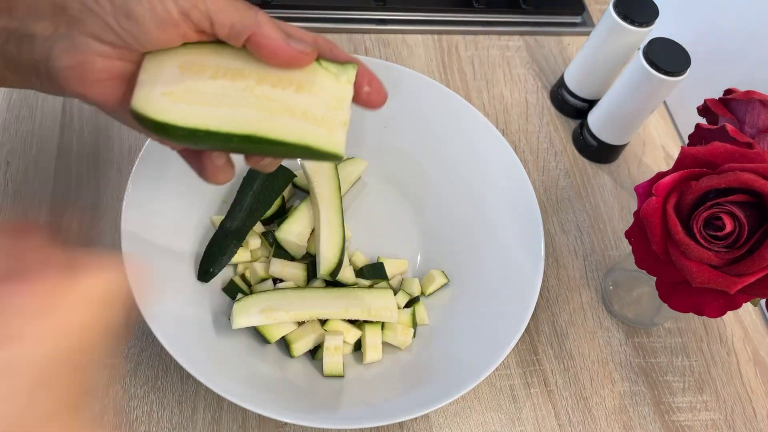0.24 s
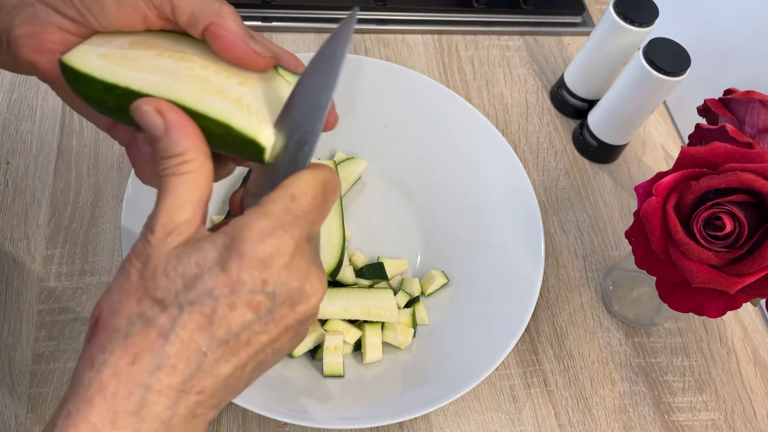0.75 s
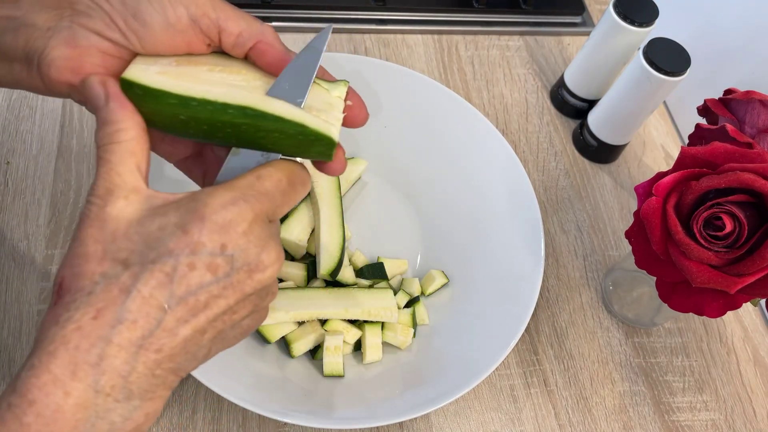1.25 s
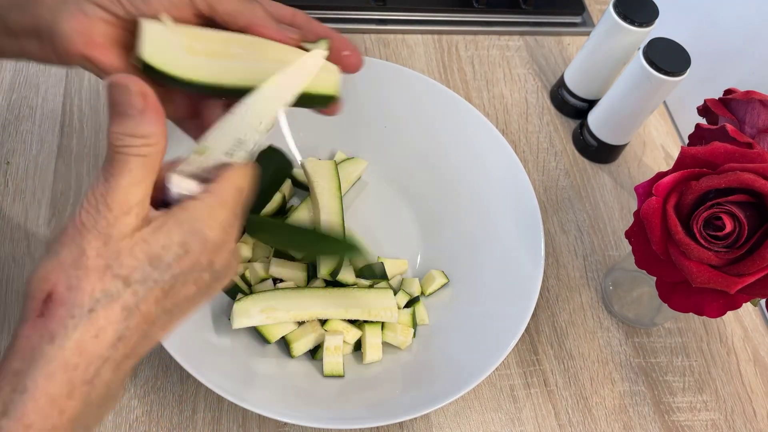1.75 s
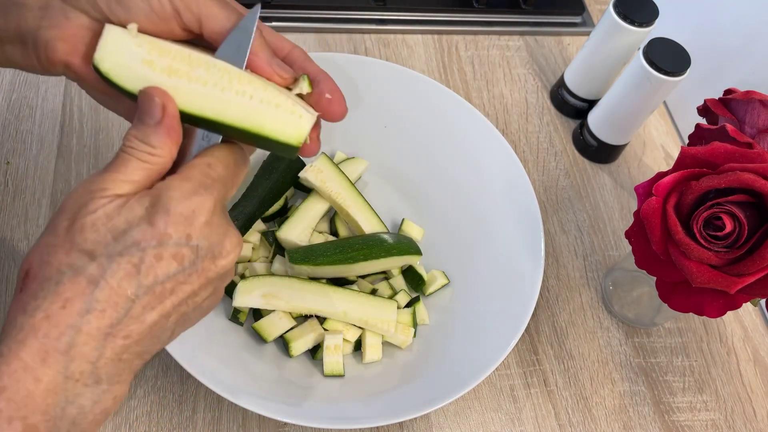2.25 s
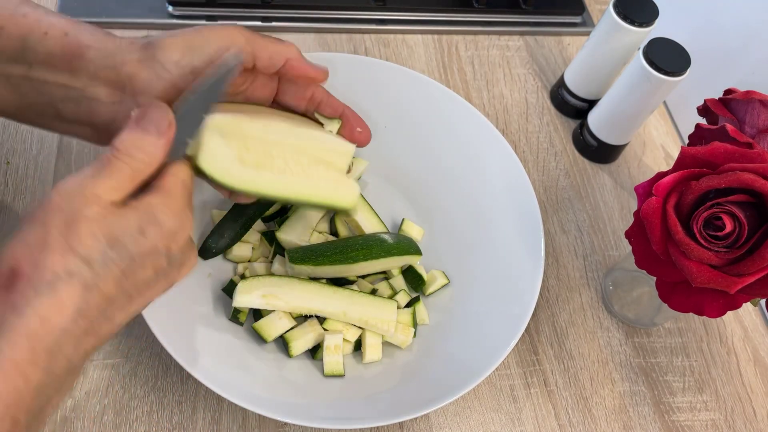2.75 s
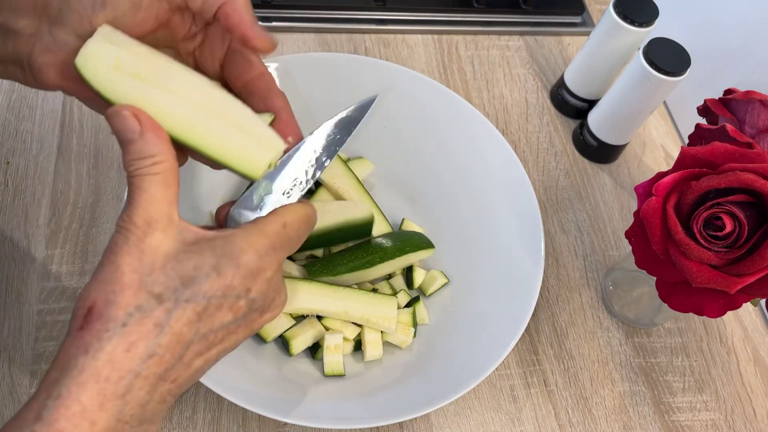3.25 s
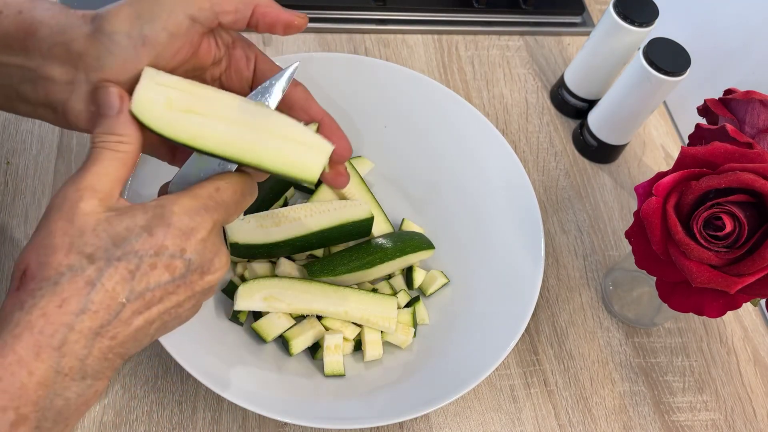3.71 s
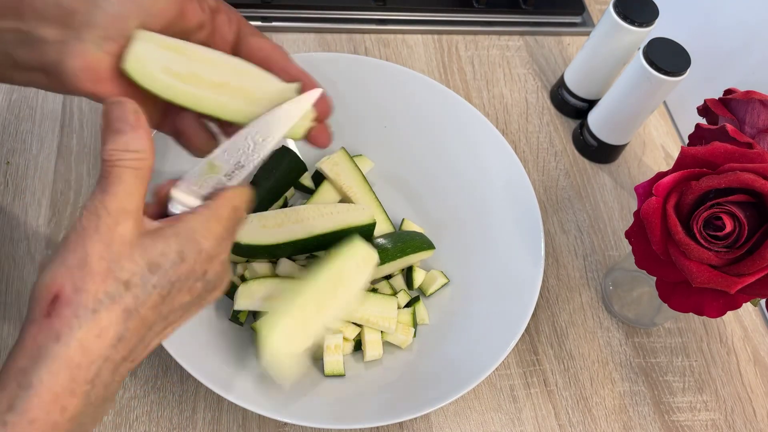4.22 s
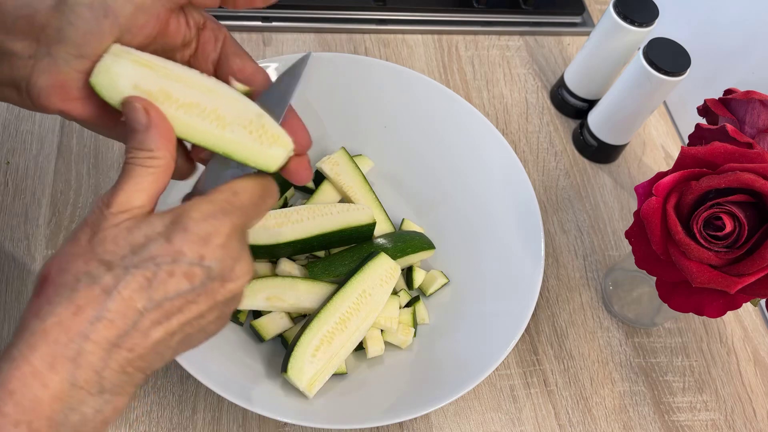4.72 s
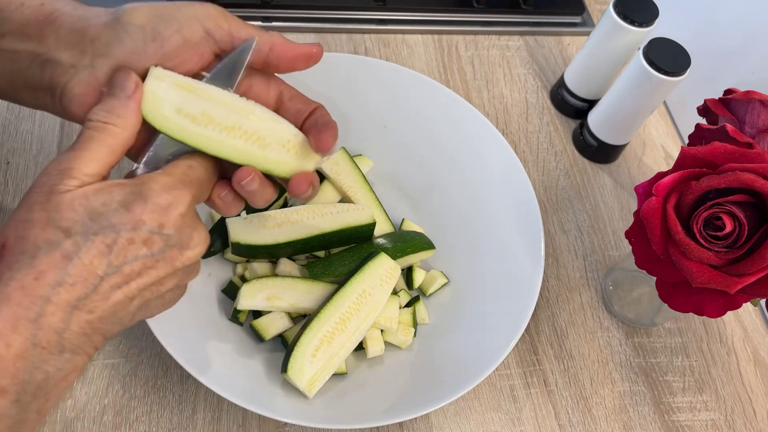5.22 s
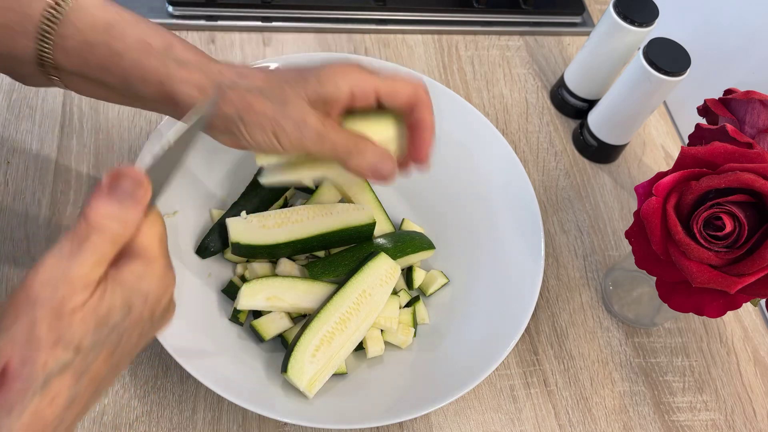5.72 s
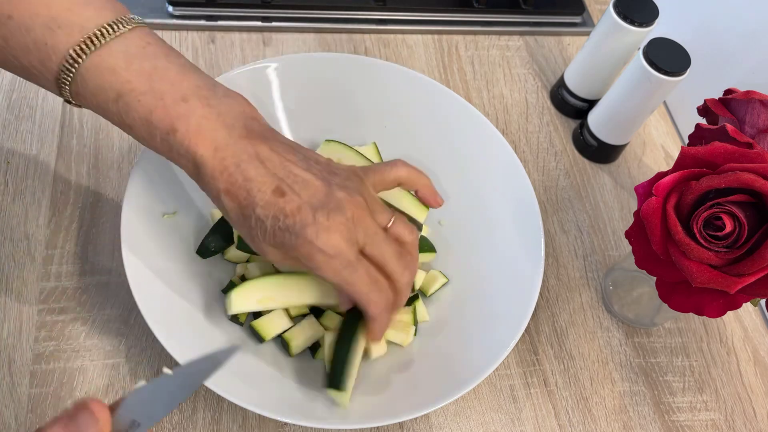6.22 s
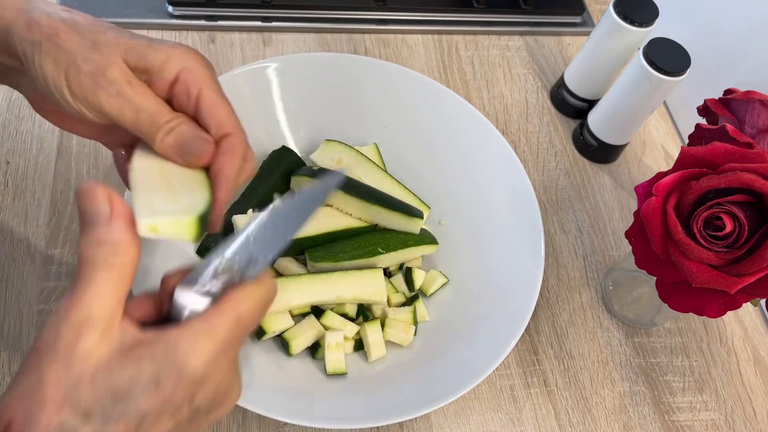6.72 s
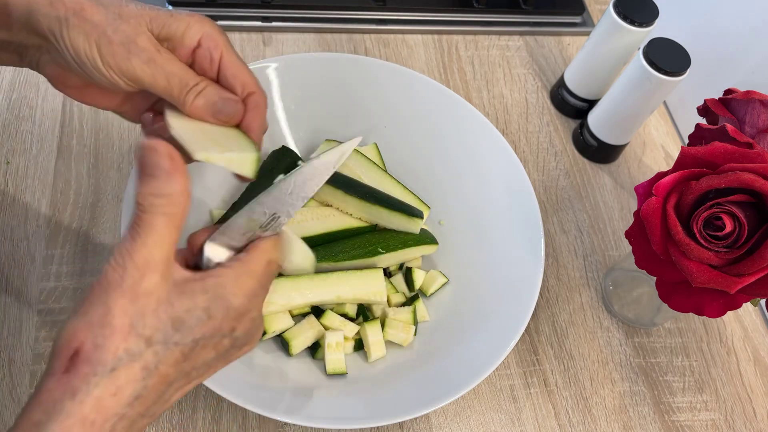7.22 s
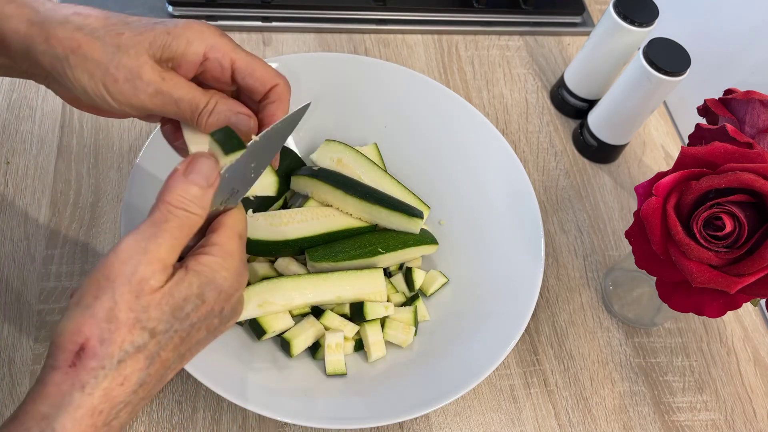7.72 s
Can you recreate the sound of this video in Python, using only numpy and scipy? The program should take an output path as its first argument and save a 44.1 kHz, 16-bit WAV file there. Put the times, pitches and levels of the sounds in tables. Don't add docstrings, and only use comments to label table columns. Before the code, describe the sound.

Close, moist crunching strokes of a blade through firm courgette, with bright snaps, dull falling pieces and a low room hum behind.

```python
import sys
import numpy as np
from scipy import signal
from scipy.fft import rfft, irfft, next_fast_len
from scipy.io import wavfile

SR = 44100
rng = np.random.default_rng(int(sys.argv[2]) if len(sys.argv) > 2 else 0)


def natural_amplitude(level_db):
    exponent = np.asarray(level_db, float) / 20
    return 10 ** exponent


def bounce(signal):
    frames = np.transpose(np.atleast_2d(signal))
    limited = np.clip(frames, -1, 1)
    pcm = np.round(limited * 32767).astype(np.int16)
    wavfile.write(sys.argv[1], SR, pcm)


N = 351036

# [t/s, peak level/dB, knock f/Hz, knock t60/s, bowl share/dB]
PIECES = [(0.141, -61, 710, 0.0096, -30), (1.695, -56, 636, 0.0097, -11), (1.879, -67, 600, 0.024, -24),
          (2.845, -56.5, 850, 0.02, -32), (2.895, -49.5, 930, 0.021, -30), (4.16, -68, 975, 0.037, -22),
          (4.267, -41, 1260, 0.017, -13), (5.805, -65, 1180, 0.027, -31), (5.821, -49.5, 940, 0.011, -27),
          (5.859, -67, 540, 0.03, -26), (5.932, -67, 890, 0.034, -27), (5.995, -66.5, 896, 0.045, -16),
          (7.338, -60, 537, 0.018, -3)]


def rms_one(x):
    return x / np.sqrt(np.mean(x ** 2) + 1e-20)


def coloured(x, spectrum):
    hz, db = np.transpose(spectrum)
    size = next_fast_len(N)
    axis = np.arange(size // 2 + 1) * SR / size + 1
    gain = natural_amplitude(np.interp(np.log(axis), np.log(hz), db, left=-90, right=-90))
    return rms_one(irfft(rfft(x, size) * gain, size)[:N])


def resonance(x, hz, width_hz):
    r = np.exp(-np.pi * width_hz / SR)
    feedback = [1, -2 * r * np.cos(2 * np.pi * hz / SR), r * r]
    return signal.lfilter([(1 - r * r) / 2, 0, (r * r - 1) / 2], feedback, x)


def strike(out, s, db, hz, t60, contact_s):
    start = round(s * SR)
    t = np.arange(min(round(t60 * SR) + 2, N - start)) / SR
    envelope = natural_amplitude(db - 60 * t / t60) * (1 - np.exp(-t / contact_s))
    out[start:start + len(t)] += envelope * np.sin(2 * np.pi * hz * t)


def background():
    # [f/Hz, level/dB per Hz]
    rumble_colour = [(24, -54), (33, -23), (42, -3), (60, -4.5), (85, -21), (110, -60)]
    upper_colour = [(45, -24), (70, -1), (130, -2), (160, -9.5), (200, -19.5), (260, -55)]
    air_colour = [(120, -27), (200, -10.5), (254, -10.5), (284, -3), (308, -9), (452, -23), (530, -15.5),
                  (903, -23.5), (1030, -25.5), (1890, -30.5), (3000, -33), (3900, -38), (6600, -120)]
    hiss_colour = [(1760, -66), (3000, -19.5), (6800, -17), (9500, -12.5), (11100, -10.5), (13000, -13),
                   (14000, -2.5), (14800, -1), (15900, 4)]
    # [t/s, lift/dB]
    stir = [
        (0, 9.5),
        (.25, 0),
        (1.3, 0),
        (1.7, 1.5),
        (3.9, -0.5),
        (4.3, 4),
        (4.7, -0.5),
        (5.6, 1),
        (7, -1),
        (7.96, 0),
    ]
    drone_hz, drone_width_hz = 287, 10
    noise = rng.standard_normal((5, N))
    stir_db = np.interp(np.arange(N) / SR, *np.transpose(stir))
    rumble = natural_amplitude(-54.5 + 0.35 * stir_db) * coloured(noise[0], rumble_colour)
    rumble += natural_amplitude(-55.5 + stir_db) * coloured(noise[4], upper_colour)
    drone = resonance(noise[1], drone_hz, drone_width_hz)
    drone = natural_amplitude(-66.5) * rms_one(resonance(drone, drone_hz, drone_width_hz))
    air = natural_amplitude(-60 + 0.49 * stir_db) * coloured(noise[2], air_colour)
    hiss = natural_amplitude(-56.5) * coloured(noise[3], hiss_colour)
    return rumble + drone + air + hiss


def kitchen(x):
    middle_t60_s, treble_t60_s = 0.5, 0.36
    t, size = np.arange(SR // 2) / SR, next_fast_len(N + SR)
    noise = rng.standard_normal(len(t))
    middle = signal.sosfilt(signal.butter(2, 4000, fs=SR, output="sos"), noise)
    tail = middle * natural_amplitude(-60 * t / middle_t60_s) + (noise - middle) * natural_amplitude(-60 * t / treble_t60_s)
    tail *= (1 - np.exp(-t / 0.00066)) / np.sqrt(np.sum(tail ** 2))
    return irfft(rfft(x, size) * rfft(tail, size), size)[:N]


def bowl():
    # [f/Hz, level/dB, t60/s]
    modes = [(899, -9, .6), (1195, -13, .2), (1353, -10, .5), (1912, -10, 2.0), (2573, -18, .7)]
    out = np.zeros(N)
    for s, db, _, _, bowl_db in PIECES:
        for hz, mode_db, t60 in modes:
            strike(out, s, db + bowl_db + mode_db, hz, t60, contact_s=0.0006)
    return out


def worktop_booms():
    # [t/s, peak level/dB, f/Hz, t60/s]
    booms = [(0.017, -36, 116, 0.11), (0.066, -40, 124.7, 0.37), (0.097, -37.5, 129, 0.25),
             (0.335, -41, 110, 0.085), (0.476, -36.5, 58.7, 0.11), (1.701, -33.5, 74, 0.18),
             (2.851, -40, 59, 0.32), (3.149, -37, 42.4, 0.14), (4.184, -41, 57.2, 0.36),
             (4.268, -34, 120, 0.05), (5.799, -39.5, 56, 0.22), (6.879, -41, 60.4, 0.1)]
    out = np.zeros(N)
    for s, db, hz, t60 in booms:
        strike(out, s, db + 0.5, hz, t60, contact_s=0.0017)
        strike(out, s + 0.0217, db + 0.5, 0.73 * hz, t60, contact_s=0.014)
    return out


def drops():
    # [f/Hz, level/dB]
    heap = [(600, 9), (800, 9), (1100, 9), (1450, -2), (1700, 2), (2000, -5.5), (2300, -3)]
    bounce_s, bounce_db = 0.019, -15
    loss_db_per_octave = 19
    out = np.zeros(N)
    for (s, db, hz, t60, _), chance in zip(PIECES, rng.random((len(PIECES), 7))):
        strike(out, s, db + 17, hz, t60, contact_s=0.0017)
        strike(out, s + bounce_s, db + 16 + bounce_db, 1.04 * hz, 2 * t60, contact_s=0.00092)
        for (mode_hz, share_db), c in zip(heap, chance):
            loss_db = loss_db_per_octave * max(np.log2(hz / mode_hz), 0)
            detuned_hz = mode_hz * (1 + 0.083 * (c - 0.5))
            strike(out, s + 0.00181 * c, db + share_db - loss_db, detuned_hz, t60, contact_s=0.000067)
    return out


def clinks():
    # [t/s, peak level/dB, f/Hz, t60/s, contact/ms]
    rings = [(0.961, -48, 1250, 0.037, 2), (1.6799, -24, 13800, .008, .15), (1.6808, -23, 14200, .008, .15),
             (1.67, -23, 13900, .014, .3), (1.680, -39, 6200, 0.014, .3), (1.5, -46, 2600, 0.036, 1.8),
             (2.8955, -41.5, 1211, 0.062, .4), (2.8952, -45, 1900, .02, .2), (4.268, -40, 560, 0.069, 1),
             (4.2675, -39, 786, 0.052, .6), (4.29, -49, 700, 0.14, 4), (2.8953, -46, 1750, .025, .2),
             (2.8445, -52, 2100, .03, .3), (5.823, -48, 1000, .06, 1), (4.274, -42, 1500, .07, 1),
             (4.281, -42, 1150, .07, 2), (5.824, -55, 4000, 0.13, 5), (7.337, -52, 4700, .04, 1),
             (7.337, -57, 2050, 0.042, 1), (7.337, -54, 6350, .04, 1), (7.733, -60, 2600, .15, 10),
             (3.533, -42, 1800, 0.059, 3), (3.558, -38, 1750, .04, 2)]
    spread = 0.049
    out = np.zeros(N)
    for (s, db, hz, t60, contact_ms), chance in zip(rings, rng.random((len(rings), 3))):
        for k, c in enumerate(chance):
            close_hz = hz * (1 + spread * (k - 1) * (0.5 + c) / 2)
            strike(out, s + c / hz, db - 5, close_hz, t60, contact_ms / 1000)
    return out


def slips():
    # [t/s, crunch level/dB, fade/ms, flesh share/dB]
    breaks = [(0.749, -46.5, 24, -10.5), (0.784, -39.5, 16, -14), (0.796, -40, 14, -15),
              (4.781, -33, 11.6, -9), (3.806, -36, 7.7, 1.5), (3.309, -42.5, 7, -3),
              (0.901, -38.5, 17.4, -14), (1.02, -54.5, 50, -7), (1.291, -34.5, 16, -4.5),
              (1.316, -29.5, 15.5, -4), (1.342, -32, 16, -2.5), (1.418, -33.5, 13.5, 0),
              (1.7, -52.5, 14, -4), (1.874, -61, 32, 0), (1.949, -58, 25, -10), (2.015, -49, 4, -5),
              (2.514, -40.5, 22, -6), (2.65, -32, 18.7, -10.5), (3.641, -54, 26, -11),
              (3.834, -33, 12, -8.5), (3.9, -31, 11.5, -33), (4.165, -53.5, 20, -8.5),
              (4.81, -35.5, 28.5, -10), (5.179, -47, 5.5, -10), (5.228, -30, 16, -9),
              (5.379, -46, 22, -12.5), (5.805, -45, 3.2, -1.5), (5.914, -48, 8, -15),
              (6.954, -47.5, 33, -8.5), (6.977, -40, 40, -18), (3.502, -46, 4.8, -3), (3.582, -60, 5, -8),
              (3.596, -52, 5.8, 1), (7.353, -70, 8.9, -8), (7.452, -41, 22.4, -22)]
    # [t/s, crunch level/dB, swell/ms, flesh share/dB]
    builds = [(1.365, -32.5, 5.6, -2.5), (2.09, -49.5, 19, -13), (2.238, -36, 26, -13),
              (2.258, -37.5, 22, -10.5), (2.555, -40.5, 36, -7.5), (3.523, -34, 7.8, -9),
              (3.507, -53, 6.5, 1), (3.894, -32, 7.9, -32), (4.015, -52, 32, -10), (4.871, -44.5, 16, -27),
              (5.236, -41, 5.4, -14), (5.534, -59.5, 50, -8), (5.655, -55.5, 37, -16),
              (5.794, -56.5, 4.6, 0), (7.004, -45, 4.9, -15), (7.023, -53, 33, -25), (7.427, -49, 36, -18)]
    # [t/s, crunch level/dB, swell and fade/ms, flesh share/dB]
    slides = [(0.826, -40, 11, -10), (0.88, -44.5, 19, -9.5), (0.939, -37.5, 12, -9),
              (0.961, -38, 12.4, -7), (1.396, -35.5, 9.2, 1), (1.448, -40, 9.8, -7), (1.489, -42, 13, -12),
              (2.052, -47.5, 9.8, -7), (2.632, -39, 14, -10), (2.665, -45, 5.9, -23), (3.42, -35, 11, -14),
              (3.439, -33, 11.4, -9.5), (3.461, -35, 16, -5.5), (3.478, -36, 5, -15), (1.41, -43, 4.6, -2),
              (3.54, -40.5, 10.2, 1.5), (3.563, -41.5, 8.3, -4), (3.88, -34, 26.5, -20.5),
              (4.842, -41.5, 8.5, 0.5), (5.206, -37.5, 9.4, -7), (5.253, -32.5, 11.3, -21),
              (5.36, -48.5, 16, -29), (5.423, -44.5, 10.3, -9), (7.013, -39, 8, -30),
              (1.47, -41.5, 7.2, -10), (3.403, -34, 10.3, -13), (3.317, -40, 10.3, -5),
              (3.782, -33.5, 7.5, -4), (3.815, -37, 6, -2), (3.763, -54, 10, -8), (3.752, -59, 12, -20),
              (5.198, -45, 4, -6), (5.47, -54, 5, -20), (2.04, -50, 5.6, -10), (3.344, -34.5, 9.8, -12),
              (3.38, -37, 9.3, -12), (4.536, -42, 6.1, -16), (4.757, -38.5, 12, -12),
              (7.432, -39.5, 13.4, -19.5), (7.649, -56, 14, -22), (7.68, -57, 17, -23),
              (7.735, -61, 28, -25), (0.713, -47, 10, -9), (0.697, -58, 13, -8), (4.795, -37.5, 7, -10)]
    # [t/s, crunch level/dB, swell and fade/ms]
    rubs = [(1.133, -54, 3.7), (1.15, -57.5, 27), (1.266, -56.5, 49), (1.78, -57, 22), (1.835, -61, 26),
            (2.365, -51.5, 18.4), (2.42, -65, 50), (2.788, -60, 38), (3.706, -54, 11), (4.444, -58, 8.7),
            (5.135, -66, 40), (5.833, -51.5, 18), (6.152, -60, 29), (6.219, -53, 5), (6.272, -58.5, 43)]
    # [t/s, crunch level/dB, fade/ms, flesh share/dB]
    slaps = [(2.844, -54, 31, -6.5), (2.894, -49, 17, -7.5), (3.666, -44.5, 8, -0.5),
             (3.677, -45.5, 9.4, -10), (3.771, -37, 6, -5), (4.258, -61, 5, 5), (4.2662, -43, 11, 2.5),
             (5.127, -58, 2.7, -15), (5.137, -58, 3, -14), (5.1657, -58, 3.8, -20), (7.336, -52, 10, -9)]
    # [t/s, crunch level/dB, fade/ms, flesh share/dB]
    chatters = [(2.1, -43, 10, -10.5), (2.131, -40, 14.5, -13), (2.159, -39, 12, -12),
                (2.19, -37.5, 8.8, -14), (2.217, -36, 12, -20), (4.56, -46.5, 18, -17),
                (4.588, -40, 17, -18), (4.617, -39, 11, -21), (4.647, -38.5, 7.3, -18),
                (4.675, -37.5, 11.5, -16), (4.703, -36.5, 12, -17), (4.731, -34.5, 8.2, -15)]
    # [t/s, crunch level/dB, swell/ms, fade/ms]
    tears = [
        (1.478, -47, 17, 19),
        (3.915, -67, 8, 25),
        (1.6806, -46.5, 1, 7.7),
        (3.899, -38, 9, 7.1),
        (5.484, -47, 3.4, 11.5),
        (5.489, -61, 68, 7),
    ]
    rows = [(s, db, 0.44 + 0.28 * ms, ms, flesh_db) for s, db, ms, flesh_db in breaks]
    rows += [(s, db, ms, 7.4 + 0.086 * ms, flesh_db) for s, db, ms, flesh_db in builds]
    rows += [(s, db, ms, ms, flesh_db) for s, db, ms, flesh_db in slides]
    rows += [(s, db, ms, ms, -9) for s, db, ms in rubs]
    rows += [(s + 0.001, db, 0, ms, flesh_db) for s, db, ms, flesh_db in slaps]
    rows += [(s, db, 7.8, ms, flesh_db) for s, db, ms, flesh_db in chatters]
    knee_db, loss = -45.5, 0.24
    rows = [(*row, 2 - loss * max(row[1] - knee_db, 0)) for row in rows]
    return rows + [(*row, -29, 12) for row in tears]


def slip_envelopes():
    power, t = np.zeros((3, N)), np.arange(-6000, 6000)
    for s, db, swell_ms, fade_ms, flesh_db, sizzle_db in slips():
        span = np.clip(round(s * SR) + t, 0, N - 1)
        width = np.where(t < 0, max(swell_ms - 1.5, 0.7), max(fade_ms - 1, 1.5)) * SR / 1000
        steepness = np.where(t < 0, 2.5, 1.9)
        bell = np.exp(-1.6 * abs(t / width) ** steepness)
        power[:, span] += bell * natural_amplitude([[db], [db + flesh_db], [db + sizzle_db]]) ** 2
    return np.sqrt(power)


def bursting_cells():
    cells_per_s, spread_db = 13000, 3
    sizes = natural_amplitude(spread_db * np.minimum(rng.exponential(1, N), 4)) * rng.choice([-1, 1], N)
    return rms_one(sizes * (rng.random(N) < cells_per_s / SR))


def patchy(x):
    # [t/s, lower lift/dB, middle lift/dB, upper lift/dB]
    slit = [(.95, -34, -5, -2), (1.3, 4.5, -1, 0), (1.45, -6, -0.5, 0), (1.69, 1, 1, 4.5),
            (2.25, -3.5, -2, -1.5), (2.53, 3, 4.5, 0.5), (2.65, -10, 1.5, -2.5), (3.32, -6, -1, 0),
            (3.8, 8.5, 3.5, 0), (3.89, -5, -2, 2.5), (4.7, -7, -3.5, 0), (4.83, -1, 0, -0.5),
            (5.2, 10.5, 2, 2.5), (5.25, -4, -4.5, 2), (5.7, -1.5, 0, 0), (7.0, -7, -1.5, 1),
            (7.44, -1, 1.5, -1), (7.65, -15, -5, -1)]
    size = next_fast_len(N)
    spectrum = rfft(x, size)
    place = 3 * np.log2(np.arange(1, size // 2 + 2) * SR / size / 2500)
    place = np.clip(place, 0, 8)
    knots = np.arange(0, N + 1500, 1500)
    s, lower_db, middle_db, upper_db = np.transpose(slit)
    band_lifts = [lower_db] * 2 + [middle_db] * 3 + [upper_db] + [0 * s] * 3
    out = 0
    for k, chance in enumerate(rng.standard_normal((9, len(knots)))):
        band = irfft(spectrum * np.clip(1 - abs(place - k), 0, 1), size)[:N]
        lift_db = np.interp(knots / SR, s, band_lifts[k])
        out = out + band * natural_amplitude(np.interp(np.arange(N), knots, 3 * chance + lift_db))
    return out


def shaken_flesh(envelope):
    # [f/Hz, width/Hz, level/dB]
    modes = [(526, 700, -5.5), (910, 126, -1.5), (1250, 160, -2), (1682, 94, -2), (1870, 157, -4),
             (2570, 250, -3), (3023, 340, -5), (3705, 290, -6.5), (4274, 270, -4), (5060, 230, -3.5),
             (6150, 170, -3)]
    # [t/s, f/Hz, lift/dB, lift of the two lowest modes/dB]
    grip = [(.8, 1790, 6.5, 4.5), (.95, 1230, 0.5, 2), (1.3, 1510, 11, -4), (1.36, 1620, 3, -5),
            (1.4, 1250, 11, -11), (1.5, 1250, 3, -10), (2.1, 1760, 7, -3), (2.25, 1250, 2.5, 2),
            (2.5, 1870, 4, -3), (3.33, 2400, 11, 1), (3.42, 1730, 7, 3.5), (3.56, 1750, 8.5, -1),
            (3.79, 1250, 4, 1.5), (4.7, 1740, 4, -8), (4.83, 2000, 5.5, -3), (5.2, 2360, 2.5, -3.5),
            (7, 1250, 0, 1.5), (7.5, 2570, -12, -1)]
    grip_octaves = 0.39
    highpass = signal.butter(2, 450, "high", fs=SR, output="sos")
    cells = signal.sosfilt(highpass, bursting_cells())
    knots = np.arange(0, N + 2000, 2000)
    wander_db = 2.66 * rng.standard_normal((len(modes), len(knots)))
    s, *columns = np.transpose(grip)
    freed_hz, freed_db, lowest_db = (np.interp(knots / SR, s, column) for column in columns)
    shaken = steady = 0
    for k, (hz, width, db) in enumerate(modes):
        nearness = np.exp(-(np.log2(hz / freed_hz) / grip_octaves) ** 2)
        lift_db = freed_db * (nearness - 0.5) + lowest_db * (k < 2)
        freed = natural_amplitude(db + np.interp(np.arange(N), knots, wander_db[k] + lift_db))
        sign = (-1) ** k
        driven = resonance(freed * envelope * cells + 1e-18, hz, width)
        shaken = shaken + sign * resonance(driven, hz, 3 * width)
        steady = steady + sign * natural_amplitude(db) * resonance(resonance(cells, hz, width), hz, 3 * width)
    return natural_amplitude(-0.5) * shaken / np.std(steady)


def snapping_fibres():
    # [t/s, peak level/dB]
    snaps = [(0.9, -24), (0.9511, -25), (1.341, -19), (0.7122, -35), (0.7462, -37), (4.7858, -23),
             (2.8546, -32), (3.3335, -27), (3.4018, -23), (2.2224, -24), (3.5956, -35), (3.6415, -33),
             (3.6673, -32), (1.68, -27), (3.7817, -21), (3.9012, -20), (3.9047, -17), (5.167, -36),
             (5.2353, -13), (5.4848, -27), (5.9148, -37), (7.0125, -23), (7.469, -29)]
    ticks = np.zeros(N)
    for s, db in snaps:
        ticks[round(s * SR)] = natural_amplitude(db + 8)
    return resonance(ticks + 1e-18, 9000, 5000) - resonance(ticks + 1e-18, 14000, 4000)


def blade():
    # [f/Hz, level/dB per Hz]
    crunch_colour = [(1300, -26), (2300, -15), (4000, -12.5), (6000, -9.5), (7500, -7.5), (9000, -1),
                     (10200, -4.5), (11100, -4.5), (12000, -18.5), (13500, -57)]
    sizzle_colour = [(11000, -23.5), (12300, -22), (13500, -14.5), (14600, -17), (16300, -17)]
    crunch, flesh, sizzle = slip_envelopes()
    direct = crunch * patchy(coloured(bursting_cells(), crunch_colour))
    direct += sizzle * coloured(bursting_cells(), sizzle_colour)
    return direct + shaken_flesh(flesh) + snapping_fibres()


def scene():
    near = blade() + drops() + worktop_booms()
    return (background() + natural_amplitude(-10.5) * kitchen(near) + bowl() + clinks() + near)[None]


def low_pass(x):
    return signal.sosfilt(signal.butter(12, 16840, fs=SR, output="sos"), x)


def record(dry):
    x = dry - 0.75 * resonance(dry, 11100, 800)
    x = signal.sosfilt(signal.ellip(14, 0.5, 70, 15760, fs=SR, output="sos"), x)
    return low_pass(x)


dry = scene()
out = record(dry)
bounce(out)
```